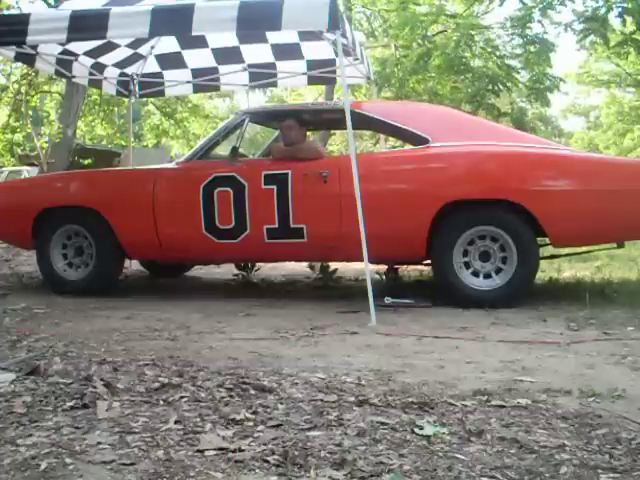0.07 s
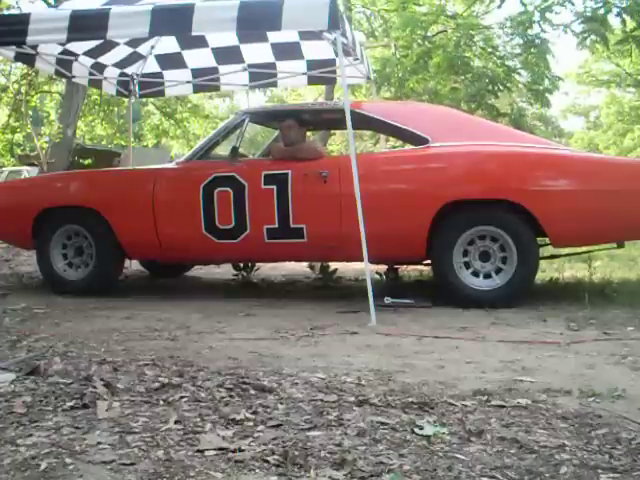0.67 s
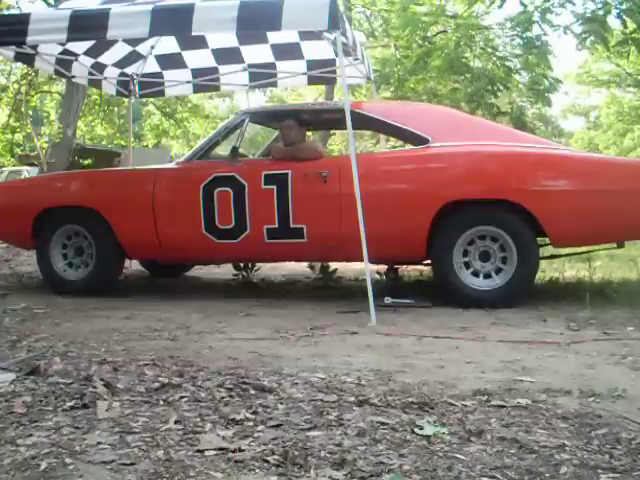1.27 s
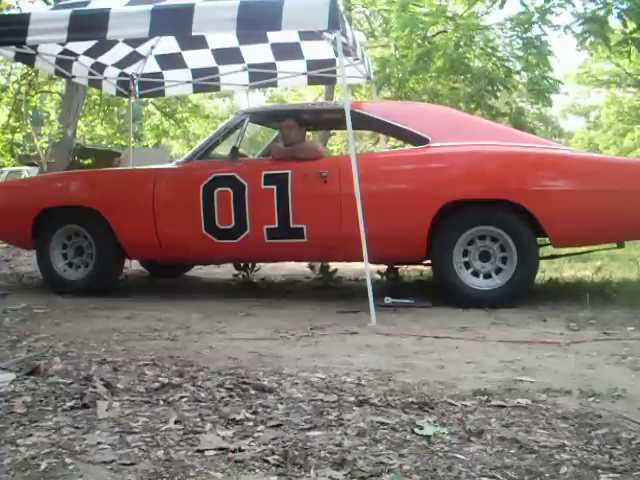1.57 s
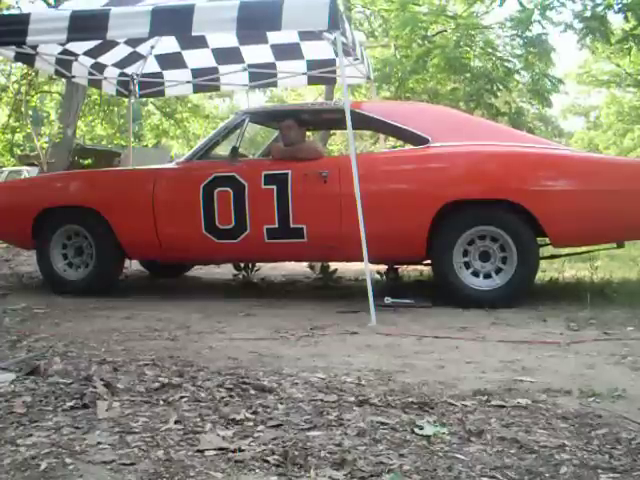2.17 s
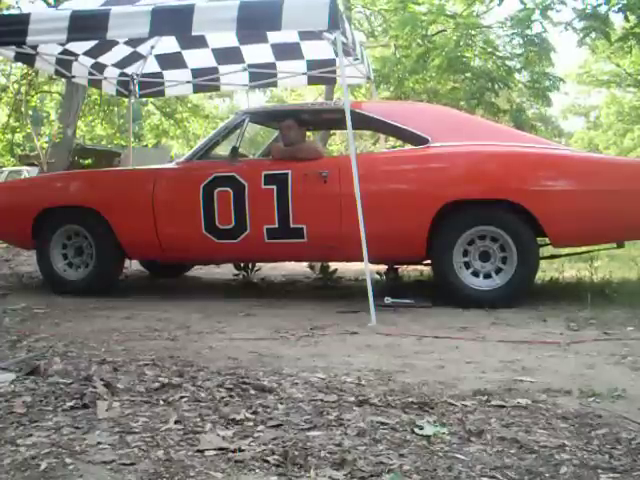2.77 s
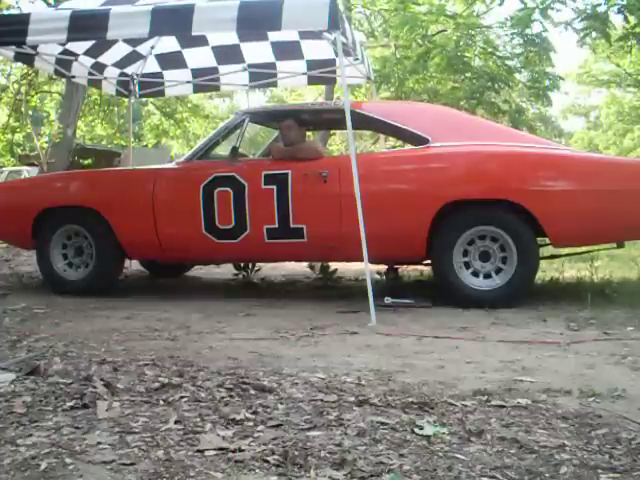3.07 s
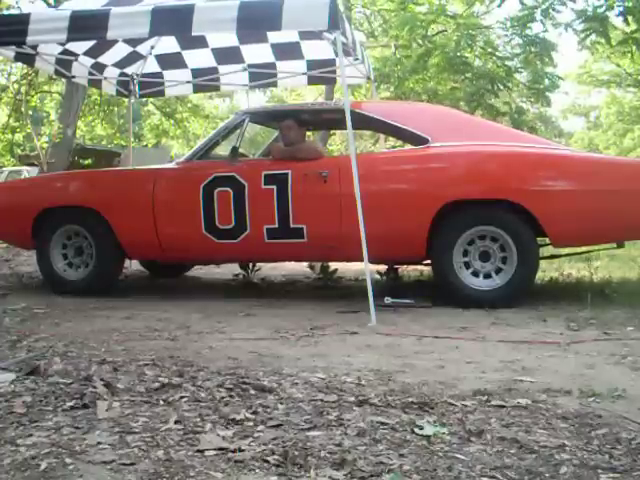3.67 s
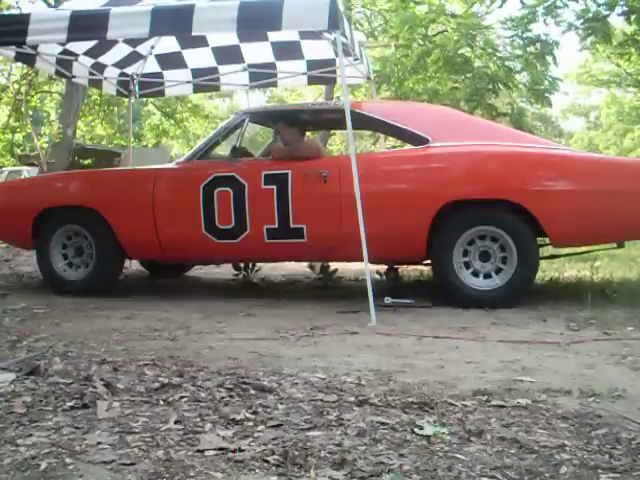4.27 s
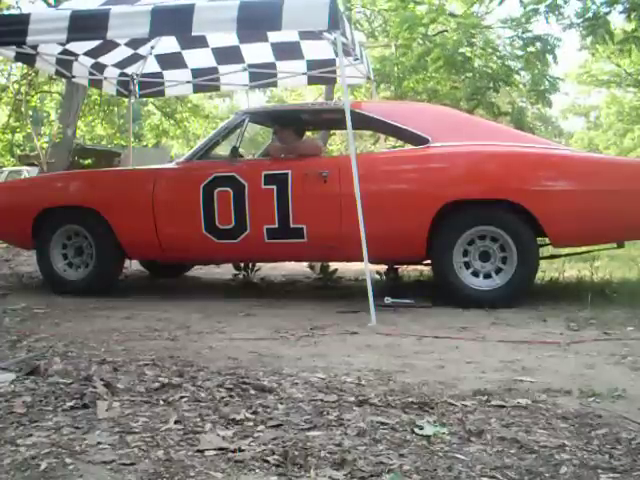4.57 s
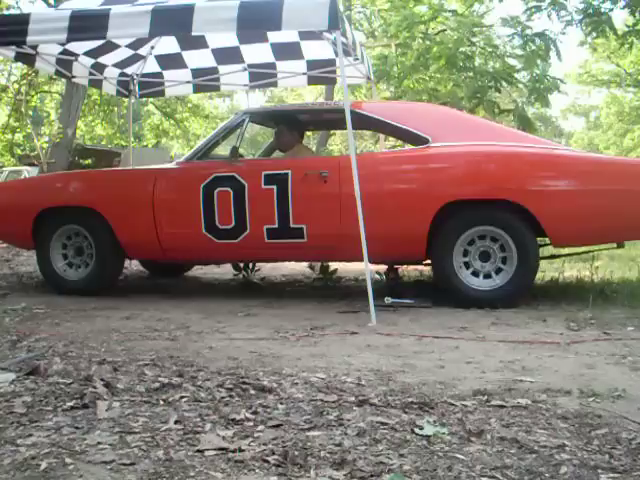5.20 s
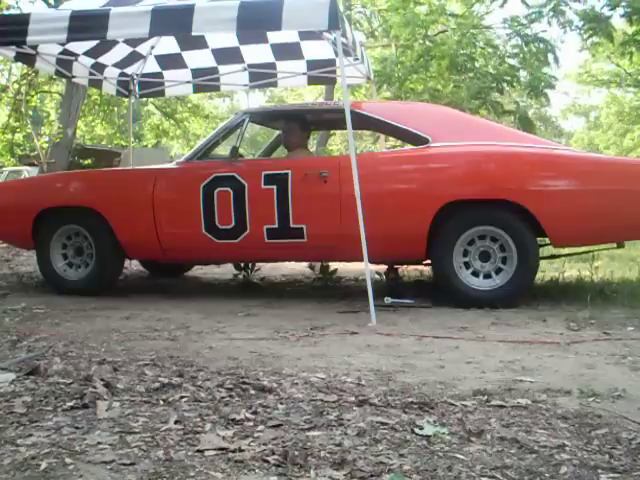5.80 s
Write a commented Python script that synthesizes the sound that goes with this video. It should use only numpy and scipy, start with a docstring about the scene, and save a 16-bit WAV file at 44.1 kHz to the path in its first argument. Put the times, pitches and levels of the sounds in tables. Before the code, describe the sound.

A parked car's big engine is revved in five quick blips, each a barking, rasping growl with hard pops and heavy exhaust thumps as the throttle shuts. The revs sag with a few backfires, then three more blips follow. The engine runs down through a string of backfires and a low boom, a loose metal part clinks, and it stops. Heard from beside the car in quiet open air.

```python
"""A parked V8 with a loud exhaust is blipped eight times, backfires as the revs fall, and runs down.
Under throttle all cylinders bark and rasp; on the overrun three heavy thumps a cycle are left.
The pipes boom and growl, the valve gear whirrs, and a loose part clinks with the last backfire.
Car body and trees echo in quiet open air. Tall peaks drive a limiter, which chops the rasp into bursts."""
import sys
import numpy as np
from scipy import signal
from scipy.fft import rfft, irfft, next_fast_len
from scipy.io import wavfile
from scipy.ndimage import uniform_filter1d

SR = 44100
rng = np.random.default_rng(int(sys.argv[2]) if len(sys.argv) > 2 else 0)


def transcribe(u):
    """Save the signal u as a 16-bit wav file named by the first command-line argument.

    u: samples, shape (n,) or (channels, n), limited to [-1, 1]; the rate is SR.
    q: integer samples, one column per channel.
    """
    v = np.clip(np.atleast_2d(u).T, -1, 1)
    q = np.round(v * 32767).astype(np.int16)
    wavfile.write(sys.argv[1], SR, q)


N = 261954
TIME_S = np.arange(N) / SR


def amp(db):
    """Decibels to gain."""
    return 10 ** (np.asarray(db) / 20)


def unit(x):
    """Scale to rms 1."""
    return x / np.sqrt(np.mean(x ** 2) + 1e-20)


def along(points, hz):
    """Read (Hz, value) points on a log frequency axis."""
    point_hz, values = np.transpose(points)
    return np.interp(np.log(hz + 1), np.log(point_hz + 1), values)


def ramp(start_s, length_s):
    """Smooth step from 0 to 1."""
    return np.sin(np.pi / 2 * np.clip((TIME_S - start_s) / length_s, 0, 1)) ** 2


def coloured(x, colour, resonances=(), size=16384):
    """Minimum-phase filter: a broad (Hz, dB) colour plus resonances."""
    hz = np.fft.rfftfreq(size, 1 / SR)
    lift_db = sum(db / (1 + (2 * (hz - centre) / width) ** 2) for centre, width, db in resonances)
    cepstrum = irfft(np.log(amp(along(colour, hz) + lift_db)))
    cepstrum[1:size // 2] *= 2
    cepstrum[size // 2 + 1:] = 0
    return signal.fftconvolve(x, irfft(np.exp(rfft(cepstrum))))[:len(x)]


def noise(colour, samples=N, resonances=()):
    """Coloured noise at rms 1."""
    return unit(coloured(rng.standard_normal(samples), colour, resonances))


# Each row: frequency in Hz, relative noise level in dB.
AIR_COLOUR = [(25, -6), (90, 6), (300, -10), (1200, -23), (4000, -29), (10000, -43), (12200, -56)]
def background():
    """Quiet outdoor rumble, and apart from it a faint, thin steady whine."""
    whine = np.sqrt(2) * np.sin(2 * np.pi * 7187 * TIME_S)
    whine_gain = amp(-68.5) + amp(-95) * ramp(6.1, 0.18)
    return amp(-51.5) * noise(AIR_COLOUR) + whine_gain * whine


# Each row: frequency in Hz, echo T60 in seconds.
ECHO_DECAY = [(100, 0.3), (800, 0.14), (4000, 0.071), (10000, 0.048)]
def outdoors(x, wet_db, delay_s=0.008):
    """Add a thin scattered echo from the car body and trees."""
    hz, t, spectra = signal.stft(rng.standard_normal(SR // 2), SR, nperseg=256)
    tail = signal.istft(spectra * amp(-60 * t / along(ECHO_DECAY, hz)[:, None]), SR, nperseg=256)[1]
    tail = np.pad(tail / np.linalg.norm(tail), (round(delay_s * SR), 0))
    return x + amp(wet_db) * signal.fftconvolve(x, tail)[:N]


# Each row: time in seconds, engine speed in cycles per second.
SPEED_CURVE = [(0, 30.2), (.08, 31), (.1, 29.3), (.25, 26.8), (.41, 34.5), (.46, 32.2), (.72, 26),
               (.94, 33.6), (.97, 31.2), (1.22, 25.5), (1.34, 25.2), (1.555, 34.2), (1.58, 31.7),
               (1.86, 25), (2, 24.2), (2.29, 34), (2.32, 31.3), (2.66, 23.5), (3.04, 18), (3.22, 27.8),
               (3.4, 25), (3.53, 31.7), (3.75, 26.2), (3.98, 35.2), (4.01, 32.2), (4.35, 24.1), (4.8, 15.5),
               (5.73, 5)]
def engine_speed(flywheel_s=0.025):
    """Cycle rate in Hz: climbs with each blip, sags, then coasts; the flywheel rounds the turns."""
    return uniform_filter1d(np.interp(TIME_S, *np.transpose(SPEED_CURVE)), round(flywheel_s * SR))


# Each row: throttle opens, throttle shuts and rasp peaks in seconds, rasp level in dB.
BLIPS = [(-.2, 0.088, 0.01, -22), (0.237, 0.452, 0.32, -20), (0.7, 0.958, 0.81, -24),
         (1.3, 1.558, 1.43, -22.5), (1.97, 2.298, 2.14, -24.5), (3.05, 3.26, 3.15, -19.5),
         (3.367, 3.572, 3.46, -20.5), (3.75, 3.981, 3.88, -22)]
def pedal(lag_s=0.066, close_s=0.11, min_fill_s=0.064, rasp_tail_s=0.09):
    """Throttle opening 0-1, cylinder load 0-1, and the gain of the rasp that swells with each blip."""
    throttle, load, swell = np.zeros((3, N))
    for opens, shuts, peak, rasp_db in BLIPS:
        held = 1 - ramp(shuts - close_s / 2, close_s)
        throttle += ramp(opens, lag_s) * held
        load += ramp(opens, max(shuts - opens - 0.08, min_fill_s)) * held
        swell += amp(rasp_db) * ramp(opens, peak - opens) * (1 - ramp(peak, shuts + rasp_tail_s - peak))
    return np.clip(throttle, 0, 1), load, swell


OVERRUN_HZ, FULL_BOOM_HZ = 25.25, 16.7  # engine cycle rates
def overrunning(cycle_hz, throttle, spread_hz=0.55):
    """Near 1 while the engine runs fast against a shut throttle, else near 0."""
    return (1 - throttle) / (1 + np.exp((OVERRUN_HZ - cycle_hz) / spread_hz))


def speed_gain(cycle_hz, db, db_per_octave, reference_hz=24.35):
    """Gain that grows with engine speed and equals db at the reference rate."""
    return amp(db + db_per_octave * np.log2(cycle_hz / reference_hz))


def turning(stall_s=5.74, fall_db_per_s=122):
    """Gain of 1 while the engine turns, falling away once it stalls."""
    return amp(-fall_db_per_s * np.maximum(TIME_S - stall_s, 0))


# Each row: frequency in Hz, relative noise level in dB.
WHIRR_COLOUR = [(300, 9.5), (1200, -7), (2200, -1), (3400, -5.5), (4200, -3), (5000, -10), (7500, -4.5),
                (10500, -16), (12200, -48)]
def whirr():
    """Soft rush of valve gear and belts."""
    return amp(-52) * turning() * noise(WHIRR_COLOUR, resonances=[(3700, 90, 7), (4050, 90, 3.8)])


# Each row: frequency in Hz, relative noise level in dB.
CLINK_COLOUR = [(1500, -20), (3500, -5), (4250, 7), (5000, -15), (9000, -30)]
def clink(start_s=5.403, level_db=-37.5, t60_s=0.11):
    """A loose metal part rings briefly as the engine shudders."""
    t = TIME_S - start_s
    fade = (t > 0) * amp(level_db - 60 * np.abs(t) / t60_s)
    return fade * noise(CLINK_COLOUR)


def boom(cycle_hz, lope_db=2):
    """The two lowest pipe modes ring at their own pitch, swelling once a cycle, until the stall."""
    colour = [(40, -31), (72, -27), (87, -6.5), (104, -20), (145, -30.5), (172, -18.5), (200, -30.5),
              (255, -31.5), (300, -32.5), (800, -81.5)]
    ring = coloured(rng.standard_normal(N), colour)
    even_ring = ring / np.sqrt(np.abs(uniform_filter1d(ring ** 2, size=2048)) + 1e-12)
    lope = amp(lope_db * np.cos(2 * np.pi * np.cumsum(cycle_hz) / SR))
    gain = speed_gain(np.minimum(cycle_hz, FULL_BOOM_HZ), db=-25, db_per_octave=7.5)
    return gain * turning() * unit(lope * even_ring)


# Engine orders, as multiples of the cycle rate.
ORDERS = [3, 5, 6, 8, 9, 11, 13, 14]
# Each row: one order's drive in dB when coasting, under load, on the overrun.
ORDER_DRIVE_DB = [(-40, -27, -16), (-27, -26, -34), (-40, -45, -20), (-32, -11, -24), (-42, -36, -24),
                  (-35, -22, -24), (-36, -17.5, -38), (-39, -30, -23)]
# Each row: frequency in Hz, pipe gain in dB for a tone sweeping through.
ORDER_RESPONSE = [(55, -17), (72, -7.5), (87, -1), (112, -4), (172, -.5), (200, -7), (262, 0), (305, -3),
                  (338, -1), (390, -3), (432, 0), (455, -7), (480, -23)]
def growl(cycle_hz):
    """The strongest engine orders: clean tones that climb with each blip and sink after it."""
    throttle, load, _ = pedal()
    phase = 2 * np.pi * np.cumsum(cycle_hz) / SR
    coasting = amp(27 * np.log2(np.minimum(cycle_hz / FULL_BOOM_HZ, 1)))
    states = np.array([coasting, load, overrunning(cycle_hz, throttle)])
    drive = np.sqrt(amp(ORDER_DRIVE_DB) ** 2 @ states ** 2)
    response = amp(along(ORDER_RESPONSE, np.outer(ORDERS, cycle_hz)))
    return np.sqrt(2) * np.sum(drive * response * np.sin(np.outer(ORDERS, phase)), axis=0)


# Each row: exhaust resonance in Hz, width in Hz, lift in dB.
PIPE_MODES = [(176.3, 22, 6), (262, 35, 6), (339, 28, 4), (425, 40, 7.5), (495, 90, -5), (578, 32, 7),
              (665, 32, 8.5), (733, 36, 9), (825, 35, 7), (2460, 42, 5), (3064, 70, 9), (3640, 60, 6.5),
              (4130, 360, 5)]
def piped(x, colour):
    """A signal coloured and rung through the exhaust pipes, at rms 1."""
    return unit(coloured(x, colour, PIPE_MODES))


def pressure_front(colour, samples):
    """One negative impulse through the pipes, at peak magnitude 1."""
    front = piped(signal.unit_impulse(samples), colour)
    return -front / np.abs(front).max()


# Each row: frequency in Hz, relative noise level in dB. Shared with the backfires.
CRACK_COLOUR = [(400, -25), (1300, 5), (2200, 5.5), (4400, -1.5), (6000, -8.5), (10300, -14.5),
                (12200, -54)]
# Each row: start in seconds, peak of the front in dB.
IGNITIONS = [(.039, 9.5), (.051, -2.5), (.113, 6), (.125, 7), (.137, -3), (0.319, 8), (.352, 11),
             (.382, 12.5), (.448, 5), (.459, 8.5), (0.555, 11), (.579, 4.5), (1.011, 8), (1.033, 7),
             (1.065, 10), (1.089, 5.5), (1.456, 5), (1.487, 4), (1.518, 9.5), (1.586, 5), (1.598, 6.5),
             (1.63, 10), (2.237, 4.5), (2.269, 1.5), (2.336, 4), (2.347, 13), (2.381, 9), (2.413, 9),
             (2.448, 0.5), (3.197, 5.5), (3.497, 11.5), (3.645, 6), (4.002, 4.5), (4.165, 4)]
def hard_ignitions(spit_t60_s=0.01):
    """Single hard ignitions around lift-off: a steep pressure front with no blast behind it."""
    t = np.arange(SR // 10) / SR
    colour = [(50, -30), (90, -4), (300, 5), (700, 5), (1100, -14), (2000, -23), (4000, -40),
              (11000, -60)]
    front = pressure_front(colour, len(t))
    out = np.zeros(N + SR)
    for start_s, db in IGNITIONS:
        spit = amp(-36 - 60 * t / spit_t60_s) * noise(CRACK_COLOUR, len(t))
        out[round(start_s * SR):][:len(t)] += amp(db) * (front + spit)
    return out[:N]


# Each row: start in seconds, level in dB, crack trim in dB.
BACKFIRES = [(2.695, -3.5, -22.5), (2.786, -8.5, -42), (2.887, -1, -23.5), (3.326, -13, -17),
             (4.385, 4.5, -16.5), (4.477, 0.5, -15), (4.579, -7.5, -25), (4.685, -13, -24),
             (4.706, -16, -36), (4.803, -15.5, -21), (5.04, -25.5, -28), (5.274, -15.5, -29),
             (5.405, -14.5, -20)]
def backfires(ring_hz=86.34, ring_t60_s=0.52, blast_t60_s=0.13, crack_t60_s=0.29, snap_t60_s=0.0065):
    """Unburnt fuel goes off in the pipe: a front, a gas blast and a crack; the lowest mode rings on."""
    t = np.arange(SR // 2) / SR
    front_colour = [(40, -63), (90, -9), (350, 15.5), (780, 9.5), (1200, -12), (4000, -40), (11000, -43)]
    blast_colour = [(50, -60), (100, 3.5), (400, 2), (780, -0.5), (1100, -24.5), (3000, -50)]
    front = amp(-0.5) * pressure_front(front_colour, len(t))
    ring = amp(-23 - 60 * t / ring_t60_s) * np.sin(2 * np.pi * ring_hz * t)
    crack_fade = amp(-60 * t / crack_t60_s) + 3.6 * amp(-60 * t / snap_t60_s)
    out = np.zeros(N + SR)
    for start_s, db, crack_db in BACKFIRES:
        blast = amp(-9.5 - 60 * t / blast_t60_s) * piped(rng.standard_normal(len(t)), blast_colour)
        crack = amp(crack_db - 9.5) * crack_fade * noise(CRACK_COLOUR, len(t))
        out[round(start_s * SR):][:len(t)] += amp(db) * (front + blast + crack) + ring
    return out[:N]


def pulses(cycle_hz, pattern, scatter_db, jitter_cycles=0.0018):
    """Impulse pattern repeated once an engine cycle, scattered in size and timing."""
    cycles = np.cumsum(cycle_hz) / SR
    place, db = np.transpose(pattern)
    chance = np.clip(rng.standard_normal((256, len(place), 2)), -1.7, 1.7)
    places = np.arange(len(chance))[:, None] + place + jitter_cycles * chance[..., 0]
    sizes = amp(db + scatter_db * chance[..., 1])
    inside = (places > 0) & (places < cycles[-1])
    return np.bincount(np.searchsorted(cycles, places[inside]), sizes[inside], N)


def puffs(train, decay_s, steady, flaring):
    """Turbulence that flares at each pulse and fades, above a steady flow."""
    flare = unit(signal.lfilter([1], [1, -np.exp(-1 / (decay_s * SR))], train))
    return (flaring * flare + steady) * rng.standard_normal(N)


# Each row: place in the cycle 0-1, relative level in dB.
FIRINGS = [(0, 0), (.125, -14), (.25, -12), (.382, 0), (.5, -14), (.625, -8), (.755, -8), (.875, -13)]  # eight cylinders, near bank loud, far bank soft
THUMPS = [(0, 0), (.355, -1), (.715, -1)]  # three on the overrun
# Spectra of the four exhaust layers. Each row: frequency in Hz, relative level in dB.
THUMP_COLOUR = [(30, -41), (58, -18), (76, -18), (120, -3.5), (175, -3), (250, -7), (450, 0.5),
                (780, -15.5), (1100, -31.5), (2000, -29.5), (6000, -54.5)]
BARK_COLOUR = [(30, -29), (60, -23), (85, -1), (150, -7.5), (260, -12), (450, 3), (780, -8), (1100, -32.5),
               (2000, -42.5), (6000, -78)]
ROAR_COLOUR = [(20, -25), (55, -19), (85, -1), (200, -3), (330, 9), (780, -2.5), (1000, -23), (1400, -17.5),
               (4000, -39.5)]
RASP_COLOUR = [(500, 6), (1200, -3), (2000, 0.5), (4600, -3.5), (5600, -10), (7500, -11), (10300, -19),
               (11300, -28.5), (12200, -53)]
def exhaust(cycle_hz, even_below_hz=30, pulsed_above_hz=17.4):
    """Pressure pulses thump and bark; the gas they push out roars and rasps through the same pipes."""
    throttle, load, swell = pedal()
    overrun = overrunning(cycle_hz, throttle)
    even = 1 / (1 + (cycle_hz / even_below_hz) ** 6)  # slow firings blur into an even rush
    pulsed = 1 / (1 + (pulsed_above_hz / cycle_hz) ** 8)  # single pulses fade as the engine runs down

    thumps = pulses(cycle_hz, THUMPS, scatter_db=2)
    thump_gain = np.hypot(speed_gain(cycle_hz, db=-30, db_per_octave=4), amp(-14.5) * overrun)
    thump = thump_gain * piped(thumps, THUMP_COLOUR)

    firings = pulses(cycle_hz, FIRINGS, scatter_db=1.5)
    coasting_bark = speed_gain(cycle_hz, db=-23, db_per_octave=9) * (1 - overrun)
    bark = np.hypot(coasting_bark, amp(-18) * load) * (1 - 0.13 * even) * piped(firings, BARK_COLOUR)

    roar_flow = puffs(firings, decay_s=0.001, steady=0.06 + even, flaring=pulsed)
    coasting_roar = speed_gain(np.minimum(cycle_hz, OVERRUN_HZ), -22.5 - 3 * overrun, db_per_octave=11.5)
    roar = np.hypot(coasting_roar, amp(-27) * load) * piped(roar_flow, ROAR_COLOUR)

    spits = pulses(cycle_hz, THUMPS, scatter_db=4, jitter_cycles=0.015)  # uneven burning
    rasp_flow = puffs(spits, decay_s=0.007, steady=0.25 + 1.5 * even, flaring=pulsed)
    rasp_gain = np.hypot(speed_gain(cycle_hz, db=-34, db_per_octave=14.5), swell)
    rasp = rasp_gain * piped(rasp_flow, RASP_COLOUR)
    return turning() * (roar + rasp) - pulsed * (thump + bark)


def scene():
    """The car in the open, heard from beside it, in mono."""
    cycle_hz = engine_speed()
    car = outdoors(exhaust(cycle_hz) + backfires() + hard_ignitions() + clink(), wet_db=-12.5)
    return (car + growl(cycle_hz) + boom(cycle_hz) + whirr() + background())[None]


def limiter(x, threshold_db=-3.5, attack_s=0.0003, release_db_per_s=500):
    """Each tall peak pushes the gain down fast; it climbs back at a steady rate."""
    over_db = np.maximum(20 * np.log10(np.abs(x) + 1e-9) - threshold_db, 0)
    climb_db = release_db_per_s * TIME_S
    cut_db = np.maximum.accumulate(over_db + climb_db, axis=-1) - climb_db
    pole = np.exp(-1 / (attack_s * SR))
    return x * amp(-signal.lfilter([1 - pole], [1, -pole], cut_db))


def record(dry, low_cut_hz=66, ceiling=0.71, top_hz=12200, taper_hz=1200):
    """Limiter, low cut, soft clip, then a steep treble roll-off."""
    low_cut = signal.butter(2, low_cut_hz, 'high', fs=SR, output='sos')
    held = signal.sosfilt(low_cut, limiter(dry))
    clipped = held / (1 + np.abs(held / ceiling) ** 12) ** (1 / 12)
    size = next_fast_len(N + SR // 2)
    passband = np.clip((top_hz - np.fft.rfftfreq(size, 1 / SR)) / taper_hz, 0, 1)
    return irfft(rfft(clipped, size) * passband, size)[..., :N]


dry = scene()
out = record(dry)
transcribe(out)
```